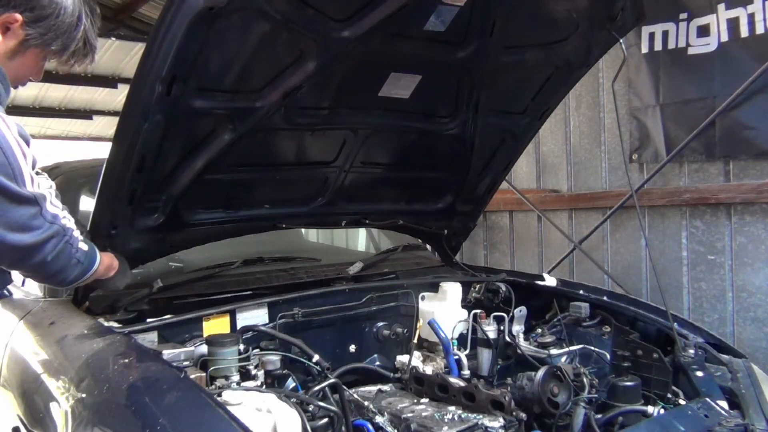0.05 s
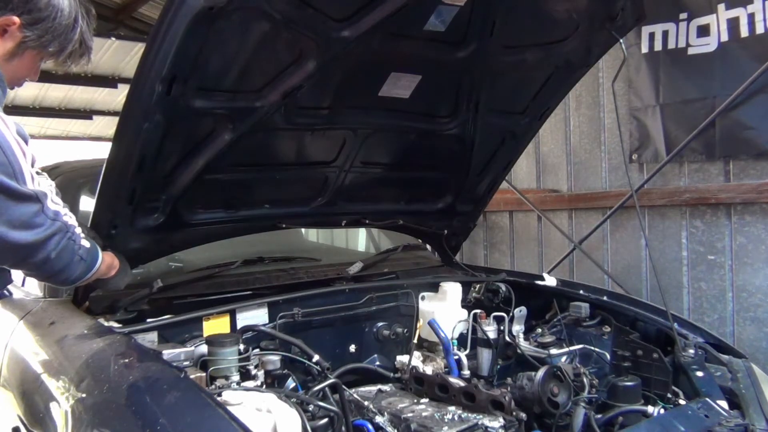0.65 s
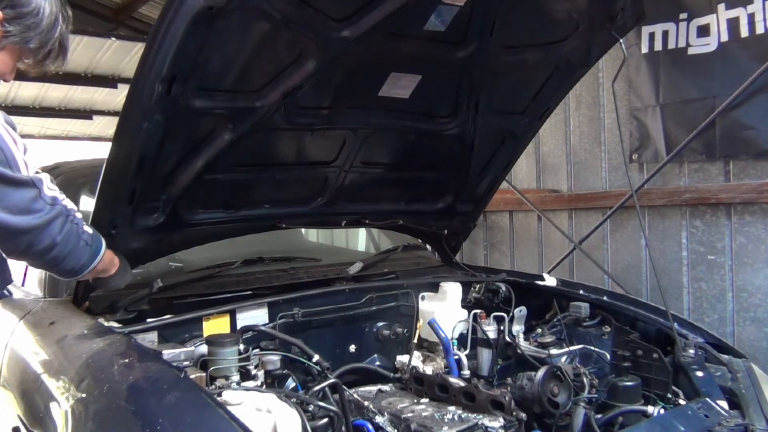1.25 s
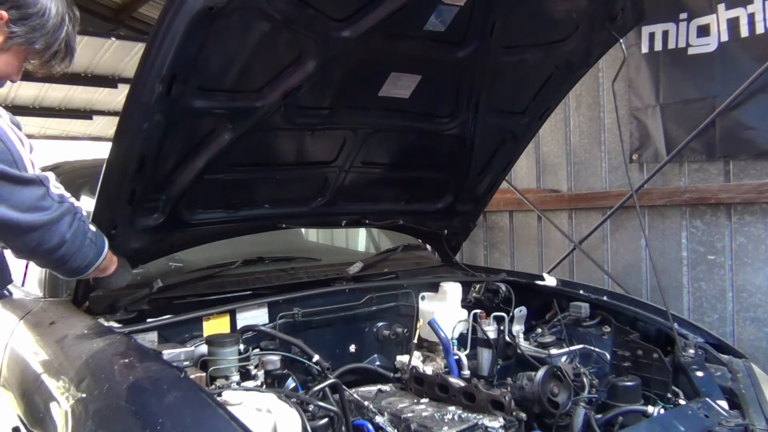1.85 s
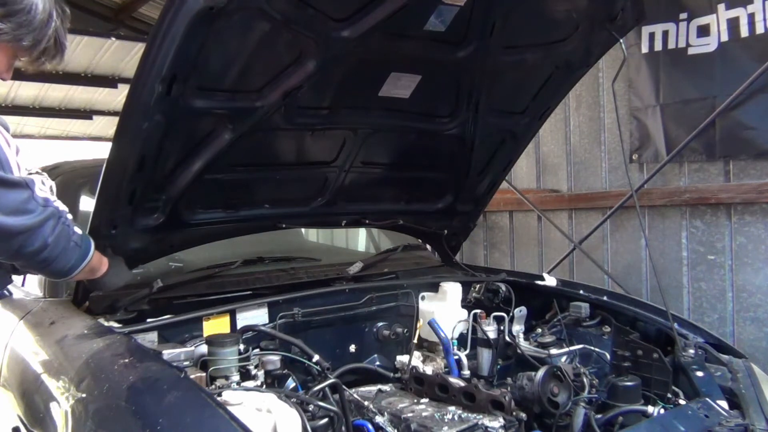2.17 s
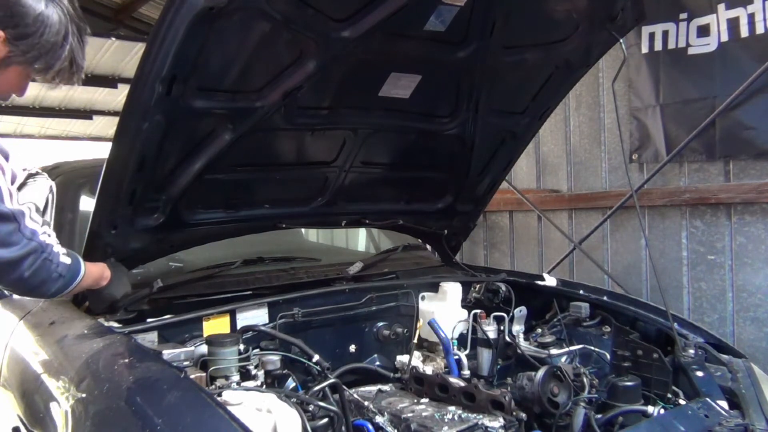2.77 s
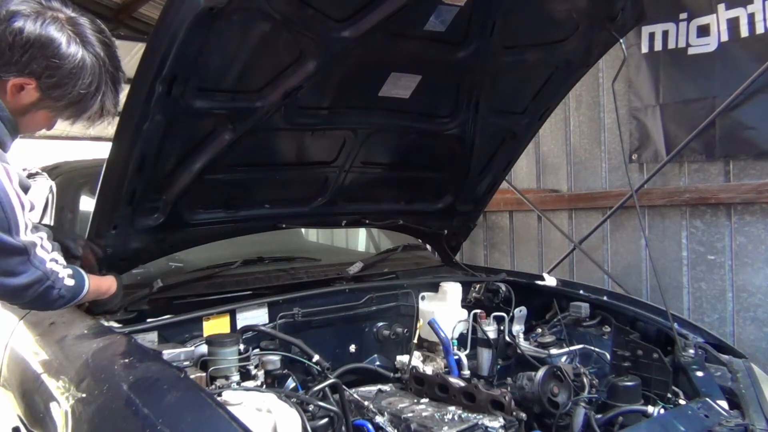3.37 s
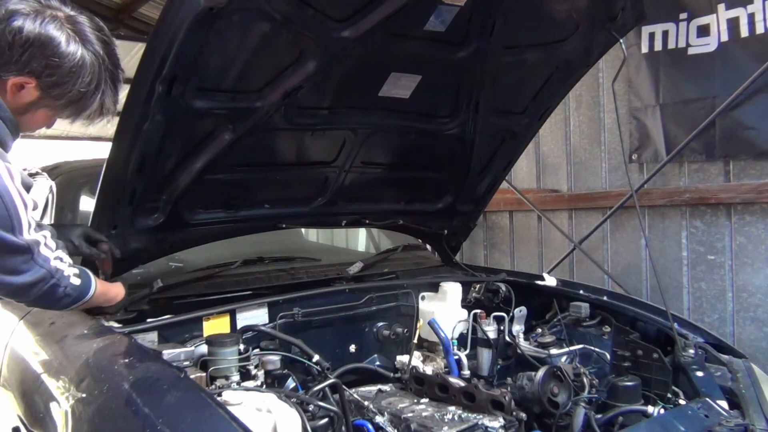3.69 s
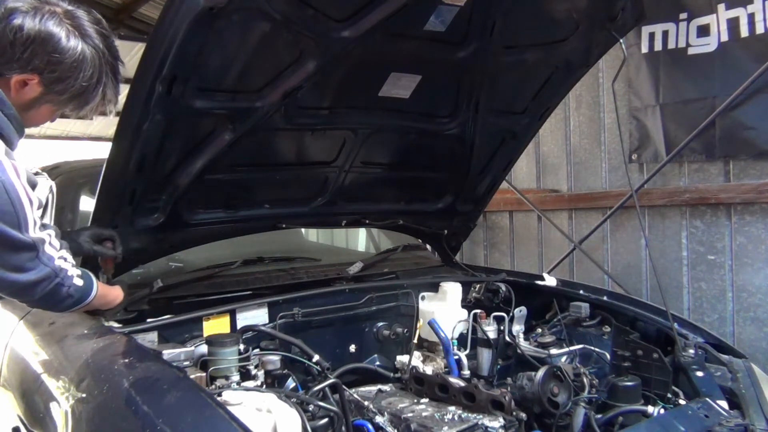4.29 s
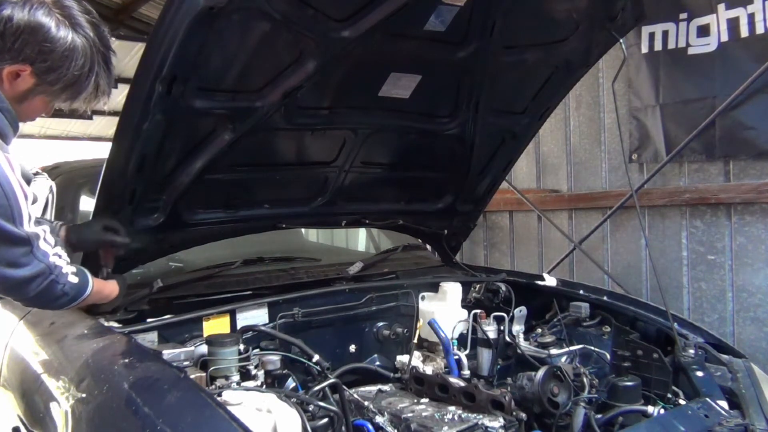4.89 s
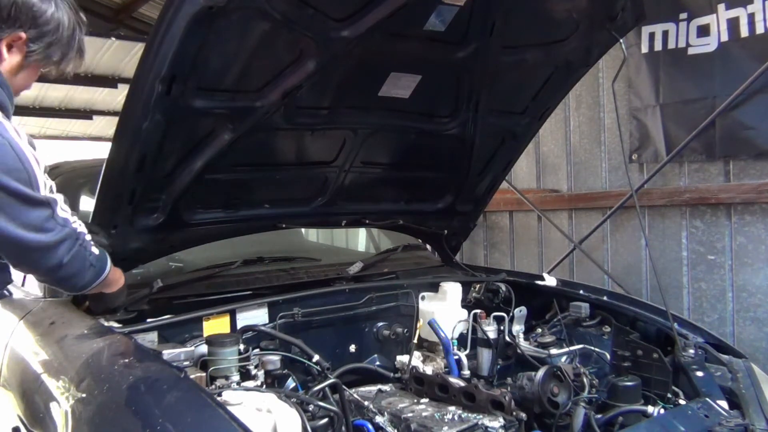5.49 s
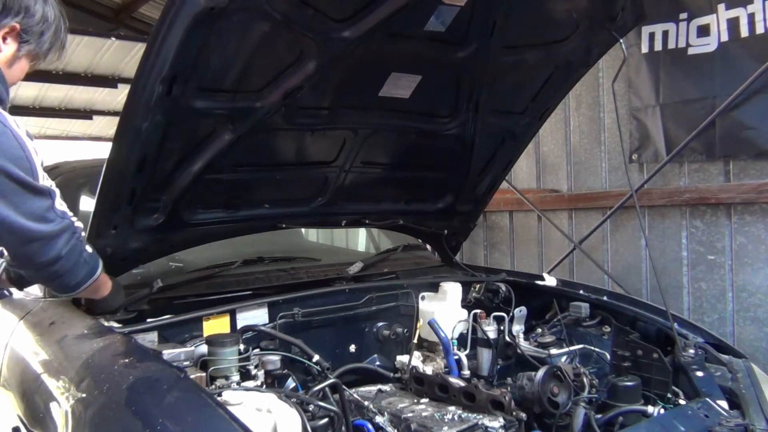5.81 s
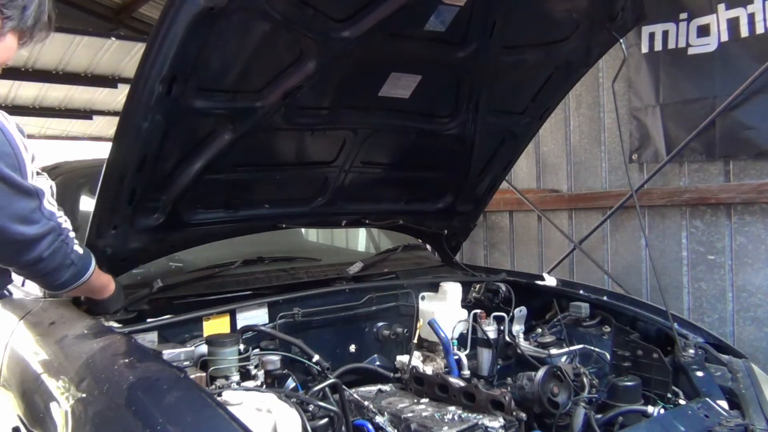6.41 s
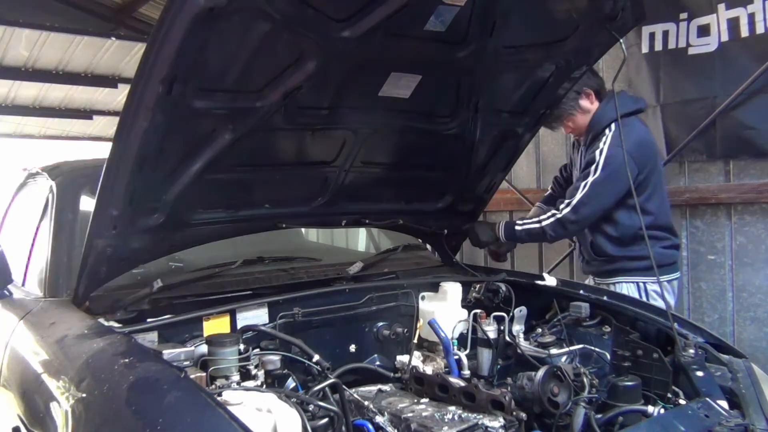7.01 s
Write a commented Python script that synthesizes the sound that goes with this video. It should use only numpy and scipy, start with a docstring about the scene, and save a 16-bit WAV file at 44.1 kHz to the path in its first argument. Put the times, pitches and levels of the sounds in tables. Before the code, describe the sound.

Sharp, ringing knocks and clicks of a hand tool on a car bonnet's hinge bolts, between soft panel bumps and quiet pauses.

```python
"""A spanner knocks loudly as it loosens the hinge bolts of a raised steel car bonnet in a tin-walled shed.
The loose bonnet bumps, a bolt scrapes in its thread and steel clicks on steel. Each contact rings
the same panel and walls: the shorter the contact, the brighter the sound. A mechanic's sleeve rubs
over faint rumble and hiss, and near the end a thin, far-off whistle swells and fades."""
import sys
import numpy as np
from scipy import signal
from scipy.fft import rfft, irfft
from scipy.io import wavfile
from scipy.ndimage import uniform_filter1d

SR = 44100
rng = np.random.default_rng(int(sys.argv[2]) if len(sys.argv) > 2 else 0)


def unload_audio(sound):
    """Save the sound as a 16-bit wav file, at the path given as the first command line argument."""
    columns = np.transpose(np.atleast_2d(sound))
    # keep every value between -1 and 1, then stretch to whole-number steps
    steps = np.round(np.clip(columns, -1, 1) * 32767)
    wavfile.write(sys.argv[1], SR, steps.astype(np.int16))


N = 319725
RING_SIZE = 32768  # samples in the ring of one contact
TIME, HZ = np.arange(N) / SR, np.fft.rfftfreq(N, 1 / SR)
RING_TIME, RING_HZ = np.arange(RING_SIZE) / SR, np.fft.rfftfreq(RING_SIZE, 1 / SR)


def gain_of(db):
    """Turns decibels into a number to multiply by."""
    return 10 ** (np.asarray(db) / 20)


def evened(x):
    """Scales a signal to an average size (rms) of one."""
    return x / np.sqrt(np.mean(x ** 2) + 1e-20)


def read(points, hz):
    """Reads between (pitch, value) points, along straight lines on a scale of octaves."""
    pitches, values = np.transpose(points)
    return np.interp(np.log(hz + 1), np.log(pitches + 1), values)


def bell(x, centre, width):
    """A smooth hill, one high at its centre."""
    return np.exp(-.5 * ((x - centre) / width) ** 2)


def add(mix, start_s, sound):
    """Adds a two-channel sound to the mix."""
    part = mix[:, round(start_s * SR):][:, :sound.shape[1]]
    part += sound[:, :part.shape[1]]


def filtered(x, gain):
    """Turns each pitch up or down, with nothing sounding before the hit (minimum phase)."""
    cepstrum = irfft(np.log(np.maximum(gain, 1e-5)))
    half = len(cepstrum) // 2
    cepstrum[1:half] *= 2
    cepstrum[half + 1:] = 0
    return irfft(rfft(x) * np.exp(rfft(cepstrum)))


def coloured(pair, colour, width):
    """Sets the tone of a pair: mid (what both ears share) and side (what sets them apart)."""
    mid_db = read(colour, HZ)
    shaped = irfft(rfft(pair) * gain_of([mid_db, mid_db + read(width, HZ)]), N)
    return shaped / shaped[0].std()


def narrow_noise(pitch_hz, width_hz):
    """Noise close to one pitch: the narrower it is, the slower it wavers."""
    return evened(irfft(rfft(rng.standard_normal(N)) * bell(HZ, pitch_hz, width_hz), N))


# Tone of the background: pitch_hz, level_db (in all tables, a level compares a row with the others)
AIR_COLOUR = [(12, -55), (20, -6), (70, -7), (103, -2), (124, -5.5), (270, -7.5), (310, -9.5), (713, -11),
              (914, -12.5), (1110, -14.5), (1270, -14.5), (3970, -20.5), (15000, -22.5)]
# Stereo width of the background: pitch_hz, side_against_mid_db
AIR_WIDTH = [(60, -29), (180, -12), (550, -3.5), (1650, -2.5), (4970, -6), (15000, -11)]
# A distant hum and a high whine: pitch_hz, width_hz, level_db
AIR_TONES = [(93, 6, -77), (15625, 70, -74)]
def air(level_db=-59):
    """The shed's quiet rumble and a hiss, with a wavering hum and a thin whine."""
    out = gain_of(level_db) * coloured(rng.standard_normal((2, N)), AIR_COLOUR, AIR_WIDTH)
    for pitch_hz, width_hz, db in AIR_TONES:
        out[0] += gain_of(db) * narrow_noise(pitch_hz, width_hz)
    return out


def slips(per_s, spread_db):
    """Rubbing surfaces catch and let go in tiny, random slips of uneven size."""
    size = gain_of(spread_db * np.minimum(rng.exponential(1, N), 4)) * rng.choice([-1, 1], N)
    return evened(size * (rng.random(N) < per_s / SR))


def swell(peak_s, length_s, rise_share, shape):
    """Loudness that rises to a peak and falls; shape 1 is pointed, 2 is rounded."""
    t = TIME - peak_s
    slope_s = length_s * np.where(t < 0, rise_share, 1 - rise_share)
    return np.exp(-abs(t / slope_s) ** shape)


# Stereo width of the sleeve and the metal sounds: pitch_hz, side_against_mid_db
WORK_WIDTH = [(100, -22.5), (350, -21), (700, -14.5), (1500, -13), (3000, -11), (6000, -9), (14000, -8)]
# Tone of rubbing cloth, and of its fizz when fast: pitch_hz, level_db
SLEEVE_COLOUR = [(300, -3.5), (1000, 1), (2000, -5), (3200, 1.5), (6000, 0.5), (9800, 1.5), (12500, -3),
                 (15500, -17)]
FIZZ_COLOUR = [(300, -45), (5000, -24), (8000, -1), (10000, 0), (13000, -4), (16000, -10)]
# The sleeve rubs along the car's wing: peak_s, level_db, length_s
RUBS = [(0.678, -54, 0.14), (0.797, -50, 0.15), (0.987, -59.5, 0.18), (1.432, -59, 0.11),
        (3.427, -60, 0.51), (4.204, -57.5, 0.19), (4.706, -62, 0.35), (5.207, -54.5, 0.067),
        (5.876, -61, 0.33), (6.974, -49.5, 0.11)]
def sleeve(body_db=-1, fizz_db=-3, fast_rub_db=-50):
    """Cloth fibres catch and let go as the arm moves; a fast rub adds a crisp fizz."""
    slow, fast = np.array([[slips(per_s=9000, spread_db=2) for _ in range(2)] for _ in range(2)])
    moves = [gain_of(db) * swell(peak_s, length_s, rise_share=0.5, shape=1.22)
             for peak_s, db, length_s in RUBS]
    rubbing = np.sqrt(sum(move ** 2 for move in moves))
    speed = rubbing / gain_of(fast_rub_db)
    body = gain_of(body_db) * coloured(slow, SLEEVE_COLOUR, WORK_WIDTH)
    fizz = gain_of(fizz_db) * speed * coloured(fast, FIZZ_COLOUR, WORK_WIDTH)
    return rubbing * (body + fizz)


def ring_shape(pitch_hz, ring_s, build_cycles=4.55, late_share=0.77):
    """A ring builds over a few cycles, so low notes bloom late; it fades 60 dB in ring_s."""
    build = 1 - late_share * np.exp(-RING_TIME * pitch_hz / build_cycles)
    return build * gain_of(-60 * RING_TIME / ring_s)


def ringing_notes(table):
    """Struck steel sounds several fading notes at once, each with its own phase in mid and side."""
    phases = rng.random((len(table), 2, 1))
    return sum(gain_of(db) * ring_shape(hz, ring_s) * np.sin(2 * np.pi * (hz * RING_TIME + phase))
               for (hz, db, ring_s), phase in zip(table, phases))


# The bonnet's own notes: pitch_hz, level_db, ring_s
BONNET_NOTES = [(149, -20, .48), (253, -21.5, .5), (287, -28, .48), (349, -20.5, .48), (410, -28, .38),
                (473, -21, .36), (521, -21.5, .32), (600, -29, .25), (655, -28, .25), (723, -25, .28),
                (767, -23, .28), (815, -28, .3), (888, -24, .28), (930, -22, .26), (978, -21.5, .26),
                (1060, -28, .23), (1178, -19, .22), (1216, -21, .19), (1254, -26, .22), (1346, -23, .21),
                (1450, -26, .22), (1514, -22, .19), (1675, -22, .2), (1810, -24, .18), (1922, -27, .21),
                (2400, -26, .2), (2740, -25, .16), (3010, -26, .18), (3880, -21, .2), (4560, -22, .19)]
def bonnet():
    """The steel panel rings with the same notes whatever hits it."""
    return ringing_notes(BONNET_NOTES)


# Pitches where the panel moves less at the hinge: pitch_hz, width_hz, level_db
DEAD_SPOTS = [(100, 15, -7), (191, 6.5, -3.5), (386, 4, -21.5), (552, 29, -1.5), (1172, 20, -13.5),
              (1557, 4.7, -14), (2170, 21, -2.5), (2244, 135, -0.5), (3390, 45, -5), (3986, 220, 0),
              (5300, 71, -3.5)]
# How long panel and shed ring when nothing damps them: pitch_hz, ring_s
RING_TIMES = [(120, 0.8), (320, 0.59), (600, 0.4), (1000, 0.33), (2200, 0.35), (4000, 0.29), (6000, 0.34),
              (12000, .23)]
def washes(count, treble_damping=0, level_db=-1, cluster_db=3.5, early_db=-2.5, early_s=0.014):
    """Countless panel notes and wall echoes blur into a wash of fading noise, one for each contact."""
    # the high notes bunch into clusters, new ones at each contact
    clusters = evened(uniform_filter1d(rng.standard_normal((count, 1, len(RING_HZ))), size=44))
    ripple_db = cluster_db * clusters * RING_HZ / (RING_HZ + 700)
    dips_db = sum(db * bell(RING_HZ, hz, width_hz) for hz, width_hz, db in DEAD_SPOTS)
    spectrum = rfft(rng.standard_normal((count, 2, RING_SIZE))) * gain_of(level_db + dips_db + ripple_db)
    centres_hz = np.geomspace(100, 14000, 11)
    ring_times = read(RING_TIMES, centres_hz) / (1 + treble_damping * centres_hz / (centres_hz + 3000))
    wash = 0
    for hz, ring_s, this_band in zip(centres_hz, ring_times, np.eye(len(centres_hz))):
        band = irfft(spectrum * read(np.c_[centres_hz, this_band], RING_HZ))
        wash += band * ring_shape(hz, ring_s)
    early_boost = 1 + gain_of(early_db) * np.exp(-RING_TIME / early_s)
    return wash * early_boost


def strike(ring, colour, bass_db, contact_ms, bass_hz=430, steepness=4.88):
    """One hit: a heavier one moves more panel and adds bass, a longer one loses treble."""
    force = gain_of(read(colour, RING_HZ) + bass_db / (1 + (RING_HZ / bass_hz) ** 2))
    dulling = np.sqrt(1 + (RING_HZ / 1000 * contact_ms) ** steepness)
    return filtered(ring, evened(force / dulling))


# Tone of a bump's push: pitch_hz, level_db
BUMP_COLOUR = [(40, -30.5), (100, -8), (150, -8), (190, -10), (260, -4), (400, -5), (750, -7.5),
               (1300, -17), (3000, -20), (12000, -16)]
# The bonnet bumps on its hinge: start_s, level_db, contact_ms
BUMPS = [(1.155, -57.5, 4.7), (1.391, -53, 3.9), (1.487, -54, 1), (2.01, -42, 1.6), (2.226, -44, 2.9),
         (2.254, -52.5, 0.52), (4.533, -29, 1.56), (5.215, -51, 0.83), (5.7077, -41.5, 0.92),
         (5.745, -43, 3.9), (5.844, -39, 0.57), (6.13, -57, 0.27), (7.05, -52.5, 0.65)]
def bumps(panel, bass_db=-4.5):
    """The loose bonnet settles with dull, booming bumps."""
    out = np.zeros((2, N))
    for (start_s, db, contact_ms), wash in zip(BUMPS, washes(len(BUMPS))):
        add(out, start_s, gain_of(db) * strike(panel + wash, BUMP_COLOUR, bass_db, contact_ms))
    return out


# Tone of one slip of the thread: pitch_hz, level_db
SCRAPE_COLOUR = [(100, -10.5), (280, 0.5), (550, 0), (1000, 0.5), (1500, -1), (2200, -9), (3000, -9),
                 (4500, -14.5), (12000, -20)]
# Turns of a bolt: start_s, length_s, level_db, contact_ms
SCRAPES = [(1.335, 0.079, -53.5, 1.33), (2.523, 0.058, -51, 0.12), (4.777, 0.35, -58, 0.3),
           (5.179, 0.021, -44.5, 0.2)]
def scrapes(panel, fade_in_s=0.015, fade_out_s=0.0053):
    """A turning bolt slips in its thread and each slip rings the bonnet; slow slips sound dull."""
    out = np.zeros((2, N))
    for (start_s, length_s, db, contact_ms), wash in zip(SCRAPES, washes(len(SCRAPES))):
        ring = strike(panel + wash, SCRAPE_COLOUR, bass_db=1.5, contact_ms=contact_ms)
        t = TIME - start_s
        turning = np.exp(np.minimum(t, 0) / fade_in_s - np.maximum(t - length_s, 0) / fade_out_s)
        friction = gain_of(db) * turning * slips(per_s=510, spread_db=4.5)
        out += signal.oaconvolve(friction[None], ring / np.linalg.norm(ring[0]), axes=1)[:, :N]
    return out


# The spanner's own notes: pitch_hz, level_db, ring_s
SPANNER_NOTES = [(1180, -3, .17), (1365, -6, .15), (1508, -1, .16), (1809, -2, .15), (2096, -2, .16),
                 (2590, -7, .21), (4560, -14, .2), (5140, -15, .17), (5690, -15, .25), (6215, -18, .2)]
def spanner():
    """The small steel tool rings high and briefly."""
    return ringing_notes(SPANNER_NOTES)


def snap(db, fade_s=0.00107):
    """The brief, dry noise of the contact itself."""
    return gain_of(db) * np.exp(-RING_TIME / fade_s) * rng.standard_normal((2, RING_SIZE))


# Tone of a knock's push: pitch_hz, level_db
KNOCK_COLOUR = [(50, -40.5), (140, -11), (190, -19.5), (260, -5.5), (480, -1.5), (800, 4.5), (1250, 3),
                (1900, -1.5), (2700, -2.5), (3900, -4.5), (5000, -12.5), (6400, -16.5), (8200, -25.5),
                (15000, -30.5)]
# The spanner knocks on the bolts: start_s, level_db, bass_db, spanner_ring_db, spot_pitch_hz
KNOCKS = [(1.467, -49, 3, -30, 785), (2.582, -43, -8, -22, 1000), (3.0598, -16, 2, -16, 3260),
          (3.572, -41, -4, -20, 1200), (3.5852, -15.5, -5.5, -32, 930), (3.5878, -20, 10.5, -26, 1260),
          (3.8993, -32, 10.5, -23, 1240), (4.076, -29, 6, -24, 1170), (4.084, -15.5, -7, -7.5, 1230),
          (4.0912, -17.5, -2, -2, 1515), (4.436, -42.5, 4, -25, 915), (4.485, -28.5, 22.5, -39, 960),
          (4.507, -29.5, 19, -12, 525), (4.527, -26.5, 20.5, -27, 463), (5.776, -36.5, -13, -5, 3100),
          (6.3587, -37.5, -11, -14, 1250)]
def knocks(panel, blow_db=-3.5, spanner_db=-3, spanner_top_hz=4000, spot_db=5, spot_octaves=0.061):
    """A bolt lets go in jerks that ring spanner and bonnet; the hand's grip damps the treble."""
    out = np.zeros((2, N))
    gripped = filtered(spanner(), 1 / np.sqrt(1 + (RING_HZ / spanner_top_hz) ** 4))
    firm_db, firm_contact_ms = -18, 0.18
    damped_washes = washes(len(KNOCKS), treble_damping=0.43)
    for (start_s, db, bass_db, ring_db, spot_hz), wash in zip(KNOCKS, damped_washes):
        # 13 dB softer, or 43 dB more bass, makes the contact twice as long and so duller
        contact_ms = firm_contact_ms * 2 ** ((firm_db - db) / 13 + bass_db / 43)
        blow = strike(panel + wash + snap(db=2, fade_s=0.0012), KNOCK_COLOUR, bass_db, contact_ms)
        # the spot that is hit favours one pitch
        spot = bell(np.log2(RING_HZ + 1), np.log2(spot_hz), spot_octaves)
        blow = filtered(blow, gain_of(blow_db + spot_db * spot))
        add(out, start_s, gain_of(db) * (blow + gain_of(ring_db + spanner_db) * gripped))
    return out


# Tone of a click's push: pitch_hz, level_db
CLICK_COLOUR = [(60, -64), (150, -16.5), (300, -4.5), (520, -8), (850, 1), (1450, 2), (1900, -2), (2550, 4),
                (3200, -3), (4400, 0.5), (7200, -1), (9000, 3), (11200, 7), (15500, -2.5)]
# Steel clicks on steel: start_s, level_db, bass_db, contact_ms
CLICKS = [(1.8812, -42, -17, .02), (1.914, -40.5, 14, .063), (1.92, -34.5, -1, 0.13),
          (1.9326, -19.5, 3.5, 0.086), (4.52, -53, 0, 0.15), (4.596, -54, 0, 0.13), (4.875, -61.5, -6, .11),
          (4.92, -56, 7, .12), (4.975, -54, -8, 0.14), (5.077, -58.5, 5, 0.16), (5.766, -51.5, 9, 0.11),
          (5.782, -41, 5, 0.11), (5.925, -56.5, -15, 0.11), (6.088, -61, 5, .16)]
def clicks(panel, level_db=0.5, spanner_db=-15, snap_even_db=-40, snap_slope=0.65):
    """Hard, light contacts: a short snap, then a bright splash off spanner, panel and walls."""
    out = np.zeros((2, N))
    steel = panel + gain_of(spanner_db) * spanner()
    for (start_s, db, bass_db, contact_ms), wash in zip(CLICKS, washes(len(CLICKS))):
        ring = steel + wash + snap(snap_slope * (snap_even_db - db))  # lighter clicks are more snap
        click = strike(ring, CLICK_COLOUR, bass_db, contact_ms, bass_hz=1490)
        add(out, start_s, gain_of(db + level_db) * click)
    return out


def whistle(peak_s=6.79, length_s=0.58, level_db=-61, pitch_hz=1510, rise_hz_per_s=160, rasp_db=2):
    """A far-off, fluttering tone rises slightly; a rasp an octave up comes out at its loudest."""
    flutter, roughness = narrow_noise(0, width_hz=80), narrow_noise(0, width_hz=480)
    phase = 2 * np.pi * np.cumsum(pitch_hz + rise_hz_per_s * (TIME - peak_s)) / SR
    effort = swell(peak_s, length_s, rise_share=0.49, shape=1.4)
    tone = effort * flutter * np.sin(phase)
    rasp = gain_of(rasp_db) * effort ** 4 * roughness * np.sin(2 * phase)
    return gain_of(level_db) * (tone + rasp)


def scene(left_db=0.2):
    """Mixes the work at the hinge with the background, a little left of centre."""
    panel = bonnet()
    mid, side = knocks(panel) + bumps(panel) + clicks(panel) + scrapes(panel)
    side = irfft(rfft(side) * gain_of(read(WORK_WIDTH, HZ)), N)
    mid, side = np.array([mid, side]) + sleeve() + air()
    mid = mid + whistle()
    return np.array([(mid + side) * gain_of(left_db), (mid - side) * gain_of(-left_db)])


def record(dry):
    """Cuts away the very highest treble."""
    low_pass = signal.firwin(767, cutoff=15900, window=("kaiser", 9), fs=SR)
    return signal.oaconvolve(dry, low_pass[None], "same", axes=1)


dry = scene()
out = record(dry)
unload_audio(out)
```